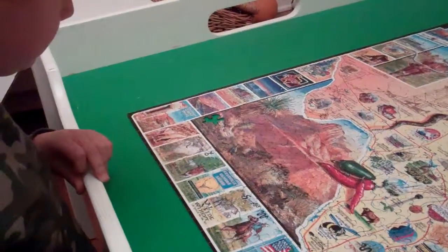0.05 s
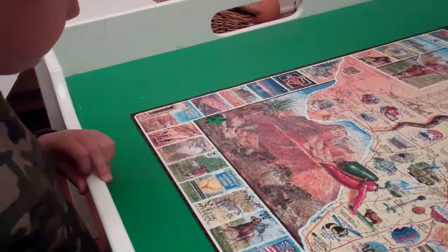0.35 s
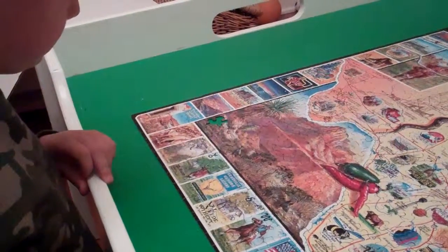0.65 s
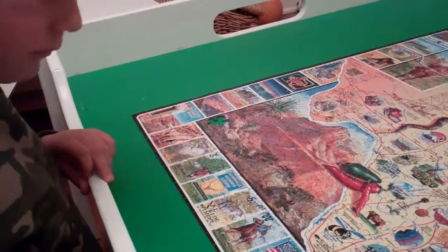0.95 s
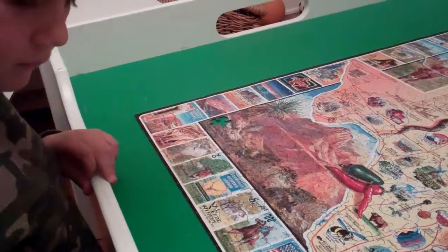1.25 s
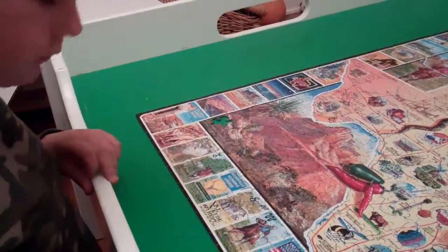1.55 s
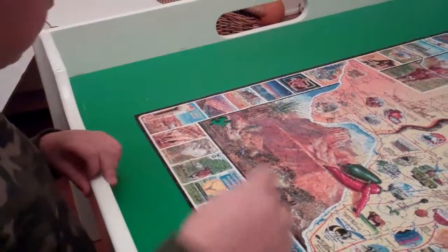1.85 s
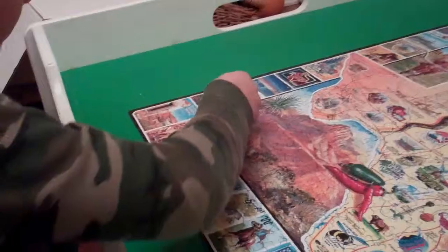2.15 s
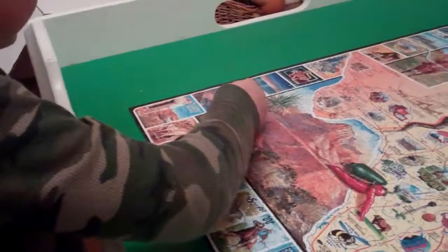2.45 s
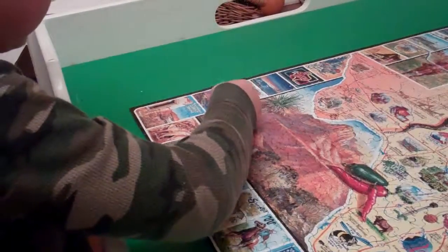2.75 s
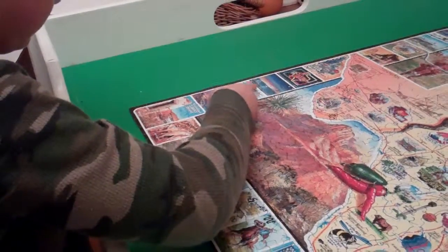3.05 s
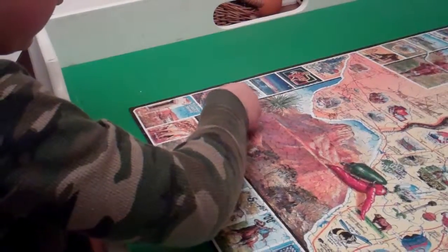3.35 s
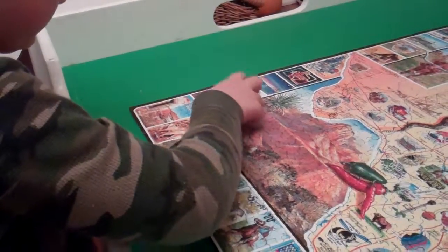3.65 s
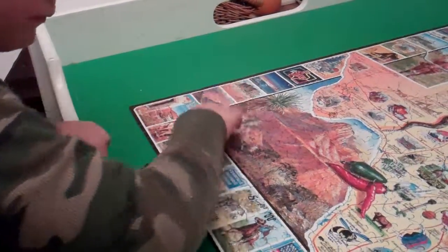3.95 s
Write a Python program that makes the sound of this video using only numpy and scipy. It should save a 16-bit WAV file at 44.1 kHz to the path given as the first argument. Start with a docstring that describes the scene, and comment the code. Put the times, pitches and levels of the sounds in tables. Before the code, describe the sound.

In a small room with a steady fan hum and faint hiss, soft table bumps and sleeve brushes come first. Then a game piece lands on a board near the microphone with a quick double tap and lighter clicks.

```python
"""A small room, the microphone by a wooden play table with a board game on it. A child reaches over, sleeve
rustling, bumps the table softly and sets a small playing piece down: a light first touch, a firm tap that
knocks the board, a short slide, then a few soft nudges. Each contact clicks and sets the board and table
ringing. A fan hums steadily in the background, and the microphone adds hiss and a thin whine."""
import sys
import numpy as np
from scipy import signal
from scipy.fft import rfft, irfft, next_fast_len
from scipy.io import wavfile
from scipy.ndimage import map_coordinates

SR = 44100
rng = np.random.default_rng(int(sys.argv[2]) if len(sys.argv) > 2 else 0)


def transcribe(signal):
    """Save signal, clipped to [-1, 1], as a 16-bit WAV file at the path in sys.argv[1]."""
    frames = np.atleast_2d(signal).T
    limited = np.clip(frames, -1, 1)
    pcm = np.round(limited * 32767).astype(np.int16)
    wavfile.write(sys.argv[1], SR, pcm)


N = 176400

# microphone hiss: (frequency [Hz], density [dB])
HISS_SPECTRUM = [(100, -3.5), (2500, 0.5), (5000, 0), (11000, -0.5), (12600, 0.5), (13700, 6),
                 (14300, -3.5)]
# electrical whine: (frequency [Hz], level [dB])
WHINE_TONES = [(3935, -86), (7853, -71), (7882, -77.5), (11803, -81)]
# air moved by the fan: (frequency [Hz], density [dB])
FAN_AIR_SPECTRUM = [(25, -27), (60, -22), (130, -19), (205, -16), (260, -4.5), (350, -1.5), (450, -1),
                    (560, -1.5), (730, -8.5), (900, -10), (1100, -6.5), (1350, -7), (1620, -7), (1900, -14),
                    (2400, -24), (3300, -38), (8000, -63)]
# that air across the stereo pair: (frequency [Hz], left-right likeness [0-1])
FAN_LIKENESS = [(40, 1), (140, 0.59), (260, 0.93), (600, 0.94), (950, 0.91), (1300, 0.66), (1650, .2),
                (2300, 0.083)]
# fan motor and housing: (frequency [Hz], level [dB], width [Hz])
MOTOR_TONES = [(60, -74.5, 0.98), (258, -62.5, 14), (333.6, -61, 14), (442.4, -55, 13), (483.7, -63, 8),
               (519.4, -60, 9), (668, -64.5, 9), (1014, -68, 9), (1065, -66.5, 10), (1101, -66, 10),
               (1301, -64.5, 10), (1323, -66, 8), (1500, -63.5, 10)]
# soft bumps against the table: (time [s], level [dB], half length [s])
TABLE_BUMPS = [(.735, -57.5, 0.012), (.8, -63, .03), (2.12, -59.5, 0.028)]
# a bump's low rumble: (frequency [Hz], density [dB])
BUMP_SPECTRUM = [(25, -19), (70, -6), (160, -3), (260, -6), (600, -42)]
# sleeve and fingers brushing past, and the piece sliding briefly on the board near 3.85 s: (time [s], level
# [dB], half length [s], centre [Hz])
RUSTLES = [(1.462, -61, .03, 9000), (1.542, -51, 0.018, 6500), (1.82, -57, 0.045, 12000),
           (1.904, -55.5, 0.0089, 6500), (2.0, -57, .04, 9000), (2.097, -56, 0.021, 6500),
           (2.38, -59, 0.032, 14000), (2.65, -64, .02, 13000), (2.92, -58.5, .025, 14000),
           (3.008, -52, .005, 12500), (3.01, -59.5, .04, 9000), (3.253, -53, 0.0095, 6000),
           (3.276, -56, 0.0085, 6500), (3.474, -60, 0.046, 12000), (3.85, -59, .06, 10000),
           (3.99, -52, 0.027, 10000)]
# rubbing cloth, and the sliding piece: (frequency [multiple of the centre], density [dB])
CLOTH_SPECTRUM = [(.1, -22), (.35, 0.5), (.7, 1), (1, 2), (1.4, 0), (2.2, -4)]
# the room's decay: (frequency [Hz], t60 [s])
ROOM_DECAY = [(150, 0.32), (1500, 0.39), (6000, 0.33), (14000, 0.12)]
# piece meets board: (time [s], click [dB], knock [dB], contact length [s], click tilt [dB/octave])
PIECE_TAPS = [(3.6215, -31, -38.5, 0.0017, 0.3), (3.6455, -26.5, -31, 0.0016, .2),
              (3.792, -40.5, -37, 0.0023, .3), (3.8105, -42, -58, 0.0061, 7), (3.879, -47, -45, 0.0049, 1)]
# the contact click: (frequency [Hz], density [dB])
CLICK_SPECTRUM = [(150, -26), (700, 2), (1500, 2), (2200, 0), (3600, -0.5), (4400, -6.5), (6500, -1),
                  (10500, -4), (13000, 4), (14500, -1.5)]
# clicks, thuds and bumps across the stereo pair: (frequency [Hz], left-right likeness [0-1])
CONTACT_LIKENESS = [(300, 0.99), (1400, 0.74), (4000, 0.17), (12000, 0.28)]
# ringing modes of board and table top: (frequency [Hz], level [dB], t60 [s])
BOARD_MODES = [(171.7, -7.5, 0.25), (203.7, -6.5, 0.18), (219.8, -3.5, .22), (265.5, -5, 0.14),
               (338, -7.5, .16), (383, -19, .15), (613, -9.5, 0.21), (677, -13, 0.11), (844, -11.5, 0.11),
               (1128, -6.5, 0.097), (1195, -9, 0.062), (1350, -9, 0.04), (2360, -20, .06),
               (2630, -19, 0.032)]
# dense board modes, heard as a thud: (frequency [Hz], density [dB])
THUD_SPECTRUM = [(60, -32), (125, -22), (200, 0), (300, -3), (450, 2), (800, -3), (1200, -4), (1800, -11.5),
                 (4000, -23)]


def amp(db):
    """Decibels to gain."""
    return 10 ** (np.asarray(db) / 20)


def unit_rms(x):
    """Scale to rms 1."""
    return x / np.sqrt(np.mean(x ** 2) + 1e-20)


def curve_at(points, hz):
    """Read (frequency [Hz], value) points on a log axis."""
    freqs, values = np.transpose(points)
    return np.interp(np.log(hz + 1), np.log(freqs + 1), values)


def pan(left_over_right_db):
    """Left and right gains for a level difference."""
    return amp(np.array([[left_over_right_db], [-left_over_right_db]]) / 2)


def wobble(rate_hz):
    """A smooth random curve of rms 1, with rate_hz knots a second."""
    position = np.arange(N) * rate_hz / SR
    return unit_rms(map_coordinates(rng.standard_normal(8192), [position], mode="wrap"))


def swell(at_s, half_s):
    """A bell-shaped rise and fall around a moment."""
    return np.exp(-0.5 * ((np.arange(N) / SR - at_s) / half_s) ** 2)


def decay(t, t60_s):
    """A free vibration's level, falling 60 dB in t60_s."""
    return amp(-60 * t / t60_s)


def filtered(x, response):
    """Shape x by a gain that depends on frequency."""
    size = next_fast_len(N + SR // 2)
    return irfft(rfft(x, size) * response(np.fft.rfftfreq(size, 1 / SR)), size)[..., :N]


def stereo_noise(spectrum, likeness=((100, 0),), tilt_db=0):
    """Coloured noise of rms 1 with a given left-right likeness and a tilt per octave."""
    def mid_side_gains(hz):
        colour = amp(curve_at(spectrum, hz) + tilt_db * np.log2(1 + hz / 100))
        angle = np.arccos(np.clip(curve_at(likeness, hz), -1, 1)) / 2
        return colour * [np.cos(angle), np.sin(angle)]

    mid, side = filtered(rng.standard_normal((2, N)), mid_side_gains)
    return unit_rms(np.array([mid + side, mid - side]))


def microphone_whine(wander_rad=0.54):
    """Thin electrical tones of unsteady phase, a quarter cycle apart in the two channels."""
    t = np.arange(N) / SR
    channel_offset = np.array([[0], [np.pi / 2]])
    whine = np.zeros((2, N))
    for hz, db in WHINE_TONES:
        phase = 2 * np.pi * hz * t + channel_offset + wander_rad * wobble(rate_hz=14)
        whine += amp(db) * np.sqrt(2) * np.sin(phase)
    return whine


def fan():
    """The background: steady moving air and the motor's wavering tones, each a narrow band."""
    air = amp(-46.5) * stereo_noise(FAN_AIR_SPECTRUM, FAN_LIKENESS)
    motor = np.zeros(N)
    for hz, db, width_hz in MOTOR_TONES:
        phase = 2 * np.pi * hz * np.arange(N) / SR
        motor += amp(db) * unit_rms(wobble(width_hz) * np.sin(phase) + wobble(width_hz) * np.cos(phase))
    return (air + motor) * pan(left_over_right_db=1)


def table_bumps():
    """The child leans softly against the table: brief swells of low rumble."""
    envelope = sum(amp(db) * swell(at_s, half_s) for at_s, db, half_s in TABLE_BUMPS)
    return envelope * stereo_noise(BUMP_SPECTRUM, CONTACT_LIKENESS)


def rustling(grain_db=3, catch_rate_hz=490):
    """Cloth and fingers brush faintly past, and the piece slides briefly on the board, grainy as the surfaces
    catch."""
    rustle = np.zeros((2, N))
    for at_s, db, half_s, centre_hz in RUSTLES:
        spectrum = [(multiple * centre_hz, level) for multiple, level in CLOTH_SPECTRUM]
        rustle += amp(db) * swell(at_s, half_s) * stereo_noise(spectrum)
    return rustle * unit_rms(amp(grain_db * wobble(catch_rate_hz)))


def room_tail(x):
    """The small room's reflections at the microphone, dying sooner in the treble."""
    hz, t, spectra = signal.stft(rng.standard_normal((2, SR // 2)), SR, nperseg=256)
    fade = decay(t, curve_at(ROOM_DECAY, hz)[:, None])
    _, tail = signal.istft(spectra * fade, SR, nperseg=256)
    return signal.fftconvolve(x, tail / np.linalg.norm(tail[0]), axes=1)[:, :N]


def board_ring(t, softer_db, pivot_hz=203.7):
    """The struck board's modes ring down; the softer the knock, the duller they sound."""
    dull_db_per_octave = 0.05 * softer_db
    ring = np.zeros(N)
    for hz, db, t60_s in BOARD_MODES:
        mode_db = db - dull_db_per_octave * np.log2(hz / pivot_hz) + rng.normal(0, 1)
        ring += amp(mode_db) * decay(t, t60_s) * np.sin(2 * np.pi * hz * t)
    return ring


def table_boom(t, hz=75.6, rise_s=0.018):
    """The table's own low mode builds after a knock and dies away."""
    return (1 - np.exp(-t / rise_s)) * decay(t, t60_s=0.42) * np.sin(2 * np.pi * hz * t)


def playing_piece(click_rise_share=0.6, board_attack_s=0.0018, board_low_hz=146):
    """Each contact is a brief gritty click and a knock that rings the board and table."""
    thud_envelope, ring, boom = np.zeros((3, N))
    click = np.zeros((2, N))
    firmest_db = max(knock_db for _, _, knock_db, _, _ in PIECE_TAPS)
    for at_s, click_db, knock_db, contact_s, tilt_db in PIECE_TAPS:
        since = np.arange(N) / SR - at_s
        contact = np.exp(-np.maximum(since, -since / click_rise_share) / contact_s)
        click += amp(click_db) * contact * stereo_noise(CLICK_SPECTRUM, CONTACT_LIKENESS, tilt_db)
        t = np.maximum(since, 0)
        push = amp(knock_db) * (1 - np.exp(-t / board_attack_s))
        thud_envelope += push * decay(t, t60_s=0.16)
        ring += push * board_ring(t, softer_db=firmest_db - knock_db)
        boom += amp(knock_db - 20) * table_boom(t)
    # the small board radiates little bass
    ring = signal.sosfilt(signal.butter(4, board_low_hz, "highpass", fs=SR, output="sos"), ring)
    thud = amp(-6.5) * thud_envelope * stereo_noise(THUD_SPECTRUM, CONTACT_LIKENESS)
    knock = ring + boom + thud
    reflections = amp(-4) * room_tail(click) + amp(-6.5) * room_tail(knock)[0]
    return click * pan(left_over_right_db=-1.2) + knock + reflections


def scene():
    """The fan behind, the child at the table, the playing piece in front."""
    return fan() + table_bumps() + rustling() + playing_piece()


def record(dry):
    """The microphone adds hiss and whine, and cuts off steeply at the top of its band."""
    top_hz, edge_width_hz = 14300, 200
    hiss = amp(-57) * unit_rms(filtered(stereo_noise(HISS_SPECTRUM), lambda hz: hz < top_hz))
    picked_up = dry + hiss + microphone_whine()
    return filtered(picked_up, lambda hz: np.clip((top_hz - hz) / edge_width_hz + 0.5, 0, 1))


dry = scene()
out = record(dry)
transcribe(out)
```